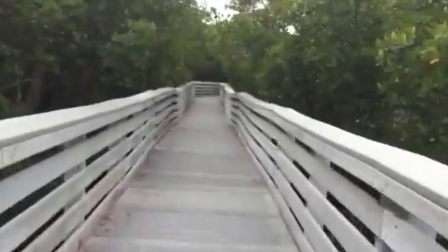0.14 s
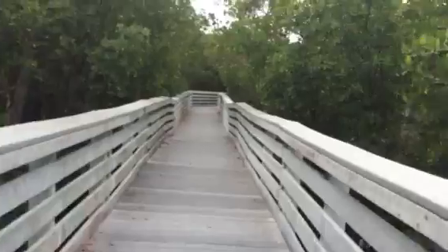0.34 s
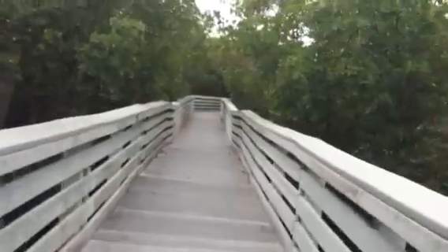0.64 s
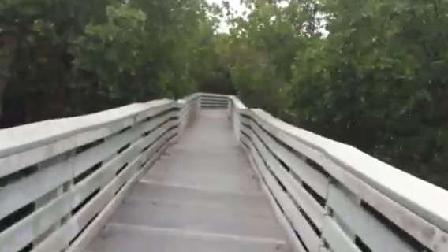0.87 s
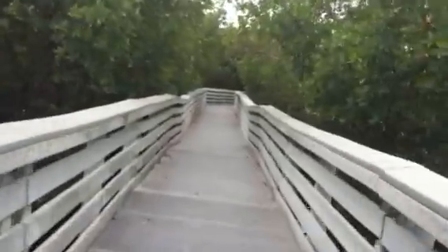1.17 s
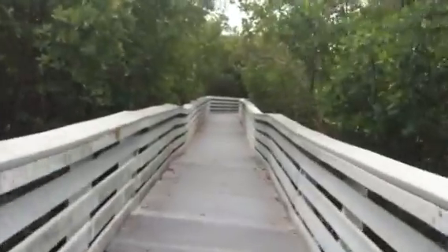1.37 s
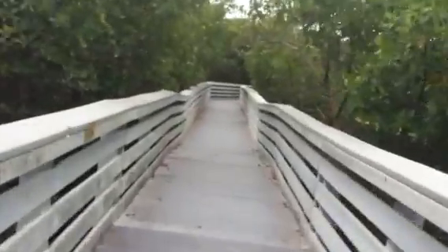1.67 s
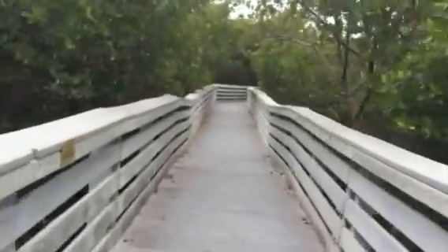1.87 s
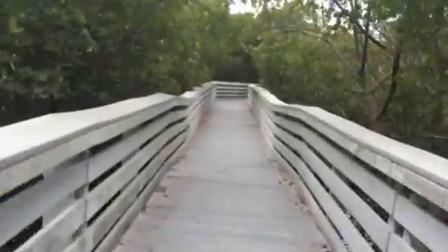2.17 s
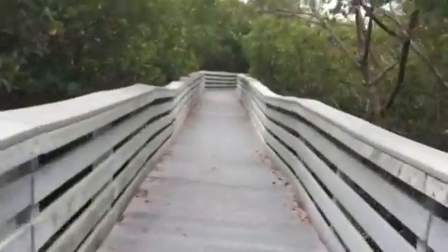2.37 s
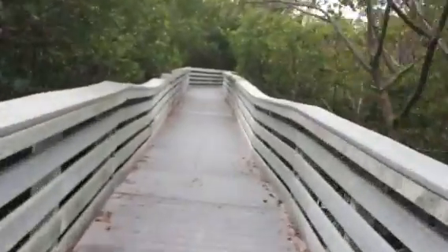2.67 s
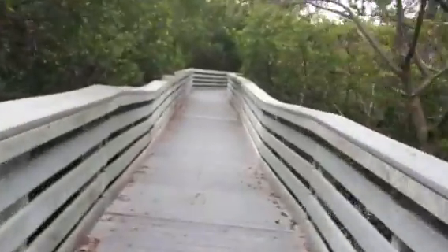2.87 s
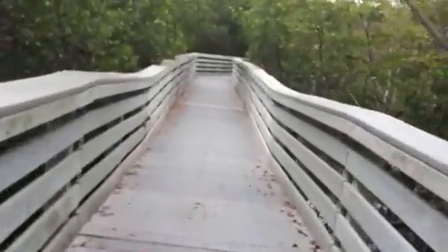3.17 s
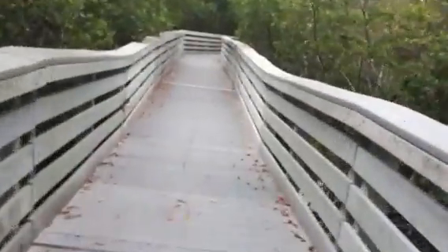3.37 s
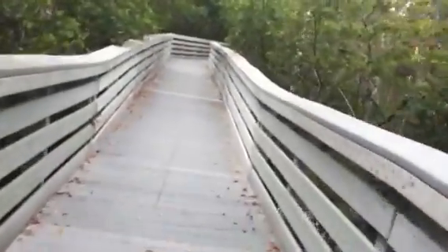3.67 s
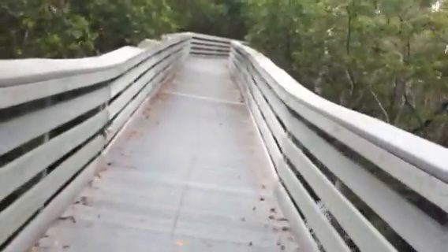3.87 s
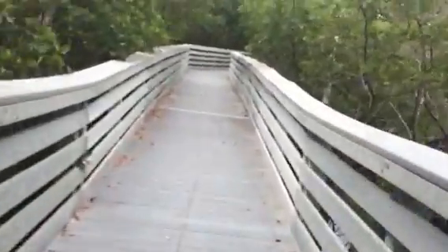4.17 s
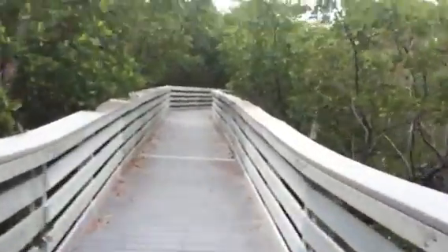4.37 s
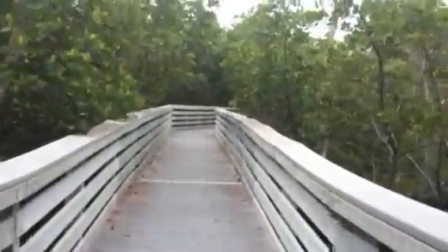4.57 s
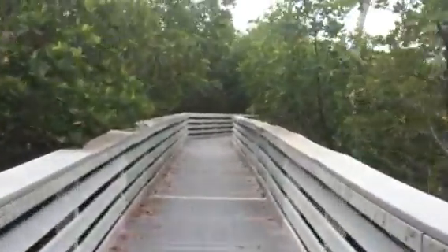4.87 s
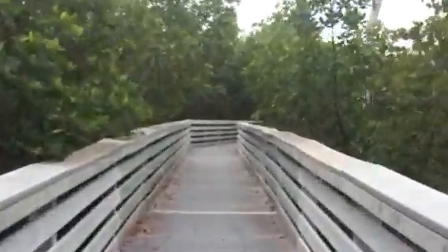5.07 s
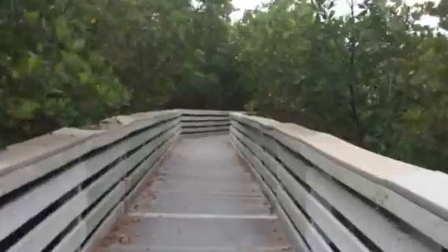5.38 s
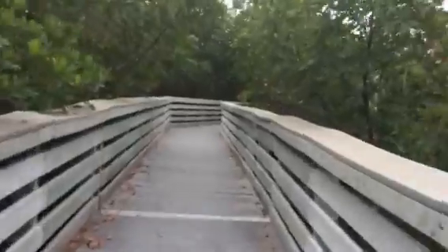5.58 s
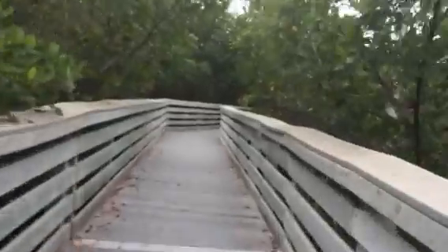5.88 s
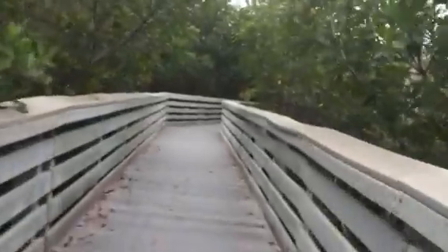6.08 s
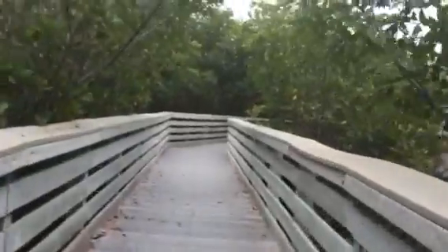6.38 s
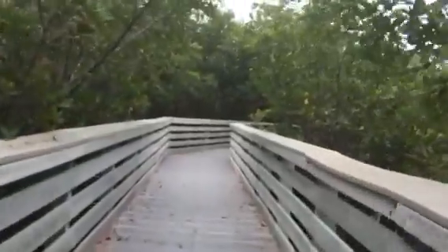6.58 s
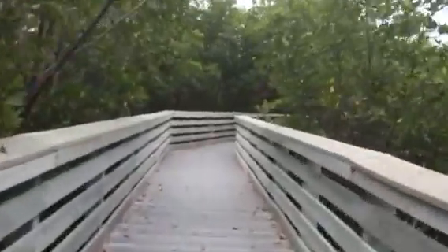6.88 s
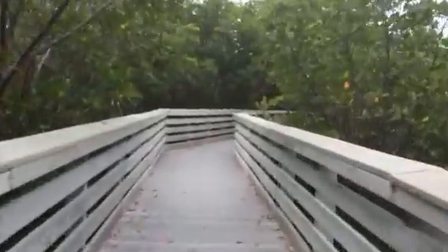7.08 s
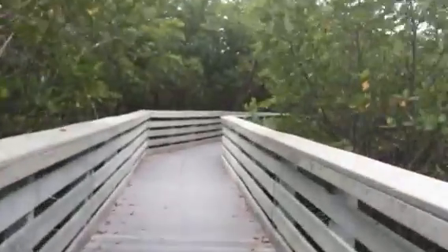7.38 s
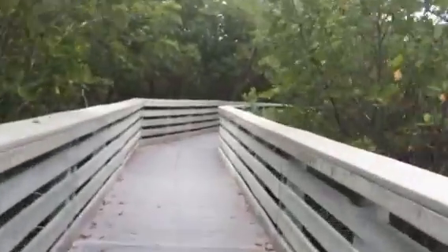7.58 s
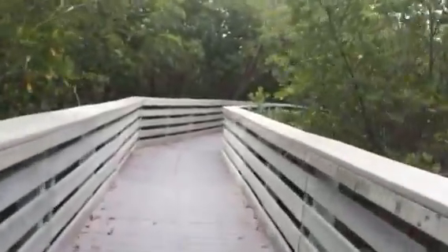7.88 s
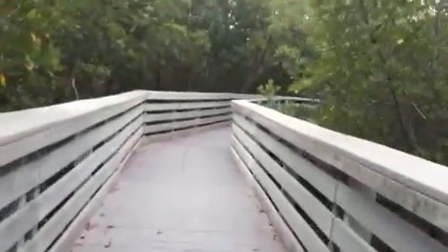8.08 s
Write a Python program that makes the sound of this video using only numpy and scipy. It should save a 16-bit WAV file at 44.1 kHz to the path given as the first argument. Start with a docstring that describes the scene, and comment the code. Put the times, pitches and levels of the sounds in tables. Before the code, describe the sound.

A bicycle coasts along a wooden boardwalk, heard very close from a handheld microphone. From 0 s a low, fluctuating deck drone mixes with soft tyre roll, faint hiss and lumpy air buffeting, with rounded low puffs strongest near 0.7 and 2 s. The freewheel ticks lightly at roughly twenty-four clicks a second. Leaves crack from 0.5 s, clustering around 1.1 to 1.8 s; a loose board knocks dully at 1.5 s and thin steel pings at 1.7 s. At 3.3 s a twig snaps hard in quick steps amid crushed leaves, with a strong board thud at 3.4 s. Metal clinks and bounces at 4.6 s; another board knocks at 5.5 s. From 6.1 to 7.1 s the ticks slow to about eight a second, with more leaf cracks and steel rattles, then speed up to the end at 8.2 s. Faint bark ticks scatter throughout; sharp sounds leave short, faint outdoor tails.

```python
"""A bicycle rolls along a wooden boardwalk; the microphone rides close by, in the rider's hand.
From the start the deck drones under the tyres, air buffets the microphone and the freewheel ticks, some
twenty teeth a second; leaves crack from 0.5 s, loose boards knock from 1.5 s and loose steel pings from 1.7 s.
A twig snaps at 3.3 s amid crushed leaves and a metal part clinks at 4.6 s; the ticks slow from 6.1 to 7.1 s.
Faint bark ticks fall throughout; nearby railings and trees scatter a tail after every sharp sound."""
import sys
import numpy as np
from scipy import signal
from scipy.fft import rfft, irfft, next_fast_len
from scipy.io import wavfile
from scipy.ndimage import map_coordinates

SR = 44100
rng = np.random.default_rng(int(sys.argv[2]) if len(sys.argv) > 2 else 0)


def inscribe(sig):
    """Save sig as 16-bit PCM at rate SR to the path in sys.argv[1].

    A 1-D sig is mono; a 2-D sig holds one channel per row.
    Samples are clipped to [-1, 1] before scaling.
    """
    pcm = np.round(np.clip(np.atleast_2d(sig).T, -1, 1) * 32767)
    wavfile.write(sys.argv[1], SR, pcm.astype(np.int16))


def field_ratio(decibels):
    """Amplitude ratio for a level in dB (20 dB per decade); scalars and array-likes work."""
    return 10 ** (np.asarray(decibels, dtype=float) / 20)


N = 363384  # samples

# course of the ride: (t/s, air buffet level before trim/dB, deck drone level before trim/dB)
RIDE_LEVELS = [(0.0, -51.5, -52.5), (0.88, -50, -45.5), (1.5, -45.5, -49), (1.74, -58, -48),
               (1.91, -45, -44.5), (2.53, -49.5, -52), (3.39, -48, -44.5), (3.81, -43, -53.5),
               (4.07, -50.5, -47), (4.36, -42.0, -55.5), (4.75, -52, -53.5), (5.59, -44.5, -53.5),
               (5.81, -51, -67), (6.11, -44, -48.5), (6.49, -56, -67), (7.0, -52.5, -59),
               (7.26, -47, -48.5), (8.23, -45.5, -50)]
# deck board modes: (f/Hz, width/Hz, relative level/dB)
DECK_MODES = [(138, 46.5, -4), (194.5, 38, -1), (282, 24, -8), (384, 54, -15)]
# spectrum of the tread's roll on wood: (f/Hz, relative level/dB)
ROLL_SPECTRUM = [(150, -21), (250, -2), (418, -8.5), (665, -10.5), (833, -12.5), (1140, -15), (1540, -22.5),
                 (1830, -20.5), (5000, -43.5), (6500, -59), (11000, -120)]
# spectrum of the tyre hiss: (f/Hz, relative level/dB)
HISS_SPECTRUM = [(1760, -2), (3000, 0.5), (3590, -1.5), (5720, -3.5), (10300, -3), (13300, -6.5),
                 (14700, -7.5), (15500, -6)]
# grit and leaf litter on the planks: (t/s, tyre hiss level/dB)
GRIT_HISS = [(0.0, -71.5), (1.17, -68.5), (2.94, -71.5), (3.45, -60.5), (3.77, -69.5), (4.31, -68.5),
             (4.84, -72.5), (5.94, -64.5), (6.84, -70.5), (8.23, -68)]
# mean roll of the tread/dB; share of the grit's swings in it
TREAD_DB, TREAD_FOLLOWS = -59.5, 0.13
# loose boards slapping: (t/s, level before trim/dB, f/Hz)
BOARD_KNOCKS = [(1.506, -35, 162), (3.381, -28, 182), (3.671, -41, 176), (5.485, -32, 232),
                (7.128, -37, 247), (7.874, -44, 197)]
# spectrum of the air buffet: (f/Hz, relative level/dB)
BUFFET_SPECTRUM = [(12, -65.5), (20, -38.5), (35, -12.5), (54, -1), (70, -0.5), (119, -5.5), (220, -11),
                   (290, -36.5), (480, -120)]
# single air puffs on the microphone: (t/s, peak level/dB, width between zero crossings/ms)
AIR_PUFFS = [(0.4915, -27.0, 6.2), (0.66, -22.5, 3.37), (1.5179, -29.5, 5.5), (1.844, -26, 6),
             (1.931, -29.5, 5.7), (1.961, -21.0, 5.9), (3.0522, -30, 5.6), (4.2474, -31.5, 5),
             (4.3496, -32, 5.3), (4.418, -33, 5.1), (5.3049, -29.5, 5.4), (6.2142, -34, 5.2),
             (7.291, -30.5, 5.3), (7.6555, -30.5, 4.8), (8.054, -36, 7.2)]
# the wheel overrunning the pedals: (t/s, ratchet teeth passed so far)
TEETH_PASSED = [(0.0278, 0), (0.6734, 16), (0.9283, 22), (1.0465, 25), (1.3084, 31), (1.4601, 35),
                (1.6761, 40), (1.8352, 44), (2.0188, 48), (2.4813, 59), (3.0425, 72), (3.2375, 76),
                (3.6706, 86), (3.8227, 89), (3.9439, 92), (4.2627, 99), (4.7726, 109), (4.8843, 111),
                (5.0504, 115), (5.2859, 120), (5.3303, 121), (5.6935, 130), (5.7693, 132), (5.9793, 138),
                (6.0786, 140), (6.3061, 142), (6.4487, 143), (6.6538, 145), (6.797, 146), (6.9965, 147),
                (7.0798, 148), (7.1671, 150), (7.2245, 152), (7.3906, 156), (7.4944, 158), (7.6735, 162),
                (7.7353, 163), (7.9823, 168), (8.092, 170), (8.2062, 173)]
# how hard the pawl lands: (t/s, level/dB)
PAWL_LEVELS = [(0, -64), (.55, -58), (.92, -64.5), (1.28, -55), (1.55, -61), (2.1, -55.5), (2.38, -61.5),
               (2.75, -55.5), (3.42, -58.5), (3.95, -60.5), (4.35, -55.5), (4.9, -63.5), (5.2, -57),
               (5.63, -61.5), (6.0, -53), (6.3, -51.5), (6.45, -60), (6.7, -51), (7.0, -58), (7.2, -59.5),
               (7.7, -56.5), (8.05, -60), (8.24, -56)]
# mean spectrum of a pawl tick: (f/Hz, relative level/dB)
PAWL_SPECTRUM = [(700, -33), (1500, -0.5), (3500, -2.5), (5800, -11), (8000, -3.5), (10400, -2.5),
                 (13000, -7.5), (15500, -4)]
# spread from tooth to tooth
TICK_SCATTER_DB, TICK_JITTER_S = 2.5, 0.0012
# leaves cracking under a tyre: (t/s, level before trim/dB, body f/Hz, crisp part relative level before trim/dB)
LEAF_CRACKS = [(0.5442, -47, 1680, -16), (1.0947, -41.5, 1240, -6), (1.202, -44, 1190, -24),
               (1.2288, -40.5, 2540, -26), (1.2548, -38, 1190, -22), (1.5695, -41.5, 2340, -7),
               (1.689, -46, 1310, -14), (1.717, -41.5, 2270, -18), (1.774, -41.5, 2440, -6),
               (2.43, -50.5, 1500, -18), (2.481, -50, 1500, -16), (3.103, -42, 1300, -11.5),
               (3.1712, -44.5, 1230, -8), (3.5197, -40, 1730, -22), (3.8737, -42.5, 1010, -12.5),
               (4.0724, -45, 1140, -10), (4.69, -48, 1020, 2), (4.775, -56, 1000, 6),
               (4.262, -47, 1500, -2), (5.0625, -47.5, 2700, -1), (5.4835, -44.5, 1400, -14),
               (6.0937, -44, 1180, -10), (6.1928, -41.5, 1970, -26.5), (6.2479, -38.5, 1050, -25.5),
               (6.305, -47.5, 1620, -28), (6.347, -46.5, 2400, 0), (6.4222, -47.5, 1170, 1),
               (6.5122, -46, 1990, -21), (6.531, -49, 1010, 3), (6.5914, -44.5, 1140, -2),
               (6.652, -45, 1450, -26.5), (7.1226, -46, 1490, -21), (7.8455, -47, 2040, -12)]
# longer crushes of leaves: (t/s, swell/s, decay by 60 dB/s, level/dB, centre f/Hz)
LEAF_CRUSHES = [(3.265, 0.026, 0.022, -47, 2960), (3.467, 0.033, 0.1, -43, 5300),
                (7.72, 0.022, 0.071, -49, 5400), (8.173, 0.014, 0.091, -59, 4900)]
CRUSH_TREBLE_DB = -18.5
# steps of the breaking twig: (t/s, level before trim/dB)
TWIG_BREAKS = [(3.2826, -3), (3.2841, -21.5), (3.2909, -9.5), (3.2968, -13)]
# what the twig on a plank rings with: (f/Hz, width/Hz, relative level/dB)
TWIG_MODES = [(313, 36, -4), (970, 260, -0.5), (1480, 300, -5), (2750, 270, -13), (3160, 70, 3),
              (3600, 1060, 4), (4450, 1400, -15.5), (7000, 1500, -13.5), (9840, 880, -22),
              (12400, 770, -8.5), (14500, 2300, -14)]
# bounces of a metal part: (t/s, level before trim/dB)
METAL_BOUNCES = [(4.6122, -38), (4.6143, -25), (4.6163, -25), (4.6185, -27.5)]
# what the metal part rings with: (f/Hz, width/Hz, relative level/dB)
METAL_MODES = [(2400, 1200, -10), (3350, 900, -1.5), (3960, 32, 4.5), (3880, 1000, 4), (5140, 22, 15),
               (6700, 1100, -26)]
# rattles of a loose steel part: (t/s, upper mode level before trim/dB, lower mode relative level/dB)
STEEL_PINGS = [(1.686, -59, -6), (4.173, -57, 3), (4.4547, -52, -11), (6.0272, -56, -22), (6.304, -44, -28),
               (6.5124, -54, -15), (6.797, -53, -19.5), (6.999, -59, -23.5)]
# modes of the steel part, upper first: (f/Hz, width/Hz, decay by 60 dB/s)
STEEL_MODES = [(12130, 320, 0.043), (6600, 120, 0.18)]
# scatter from railings and trees around the deck: (f/Hz, decay by 60 dB/s)
RAIL_DECAYS = [(400, 0.15), (4500, 0.23), (10000, 0.33)]


def unit(x):
    """Scale to rms 1."""
    return x / np.sqrt(np.mean(x ** 2) + 1e-20)


def along(points, hz):
    """Read (f/Hz, value) points on a log frequency axis."""
    f, value = np.transpose(points)
    return np.interp(np.log(hz + 1), np.log(f + 1), value)


def curves(rows):
    """One value per sample for each column after the time."""
    s, *columns = np.transpose(rows)
    return [np.interp(np.arange(N) / SR, s, column) for column in columns]


def wobble(rate):
    """A smooth random curve, rate knots a second."""
    knots = rng.standard_normal(int(N * rate / SR) + 4)
    return map_coordinates(knots, [np.arange(N) * rate / SR])


def filtered(x, response):
    """Pass x through a response given as a function of frequency."""
    m = next_fast_len(len(x) + min(len(x) // 4, 8192))  # room for the ringing
    spectrum = rfft(x, m) * response(np.fft.rfftfreq(m, 1 / SR))
    return irfft(spectrum, m)[:len(x)]


def coloured(spectrum):
    """Noise of rms 1 with the given spectrum."""
    return unit(filtered(rng.standard_normal(N), lambda hz: field_ratio(along(spectrum, hz))))


def resonances(modes):
    """Causal response of (f/Hz, width/Hz, level/dB) resonances, alternating in sign."""
    def response(f):
        total = 0
        for k, (centre, width, db) in enumerate(modes):
            damping = 1j * f * width
            total = total + (-1) ** k * field_ratio(db) * damping / (centre * centre - f * f + damping)
        return total
    return response


def add(track, s, sound):
    """Mix a sound into the track at a time."""
    part = track[max(round(s * SR), 0):][:len(sound)]
    part += sound[:len(part)]


def burst(rise, t60):
    """Envelope of peak 1: an exponential rise times a decay of 60 dB in t60 seconds."""
    t = np.arange(SR // 5) / SR
    shape = (1 - np.exp(-t / rise)) * field_ratio(-60 * t / t60)
    return shape / shape.max()


def spiky(power):
    """A fifth of a second of noise with random spikes, sharper for a higher power."""
    return rng.standard_normal(SR // 5) * rng.exponential(size=SR // 5) ** power


def tyres():
    """Tread roughness shakes the boards into their modes; above them rubber rolls and hisses on wood."""
    hiss_db, = curves(GRIT_HISS)
    roll_db = TREAD_DB + TREAD_FOLLOWS * (hiss_db - hiss_db.mean())
    shake = field_ratio(2.8 * wobble(11)) * rng.standard_normal(N)
    ringing = filtered(shake, resonances(DECK_MODES))
    boards = unit(filtered(ringing, resonances([(200, 250, 0)])))
    grain = field_ratio(1.4 * wobble(25) + 1.35 * wobble(120))  # of the planks
    roll = unit(grain * coloured(ROLL_SPECTRUM))
    hiss = unit(field_ratio(1.2 * wobble(11)) * coloured(HISS_SPECTRUM))
    drone_db = curves(RIDE_LEVELS)[1] - 2.5
    return field_ratio(drone_db) * boards + field_ratio(roll_db) * roll + field_ratio(hiss_db) * hiss


def loose_boards():
    """A loose board slaps its joist and gives one low, quickly damped tone."""
    out, t = np.zeros(N), np.arange(SR // 5) / SR
    for s, db, hz in BOARD_KNOCKS:
        add(out, s, field_ratio(db - 3.0) * burst(0.0024, 0.061) * np.sin(2 * np.pi * hz * t))
    return out


def air():
    """Air flowing past the microphone: a lumpy low buffet and single rounded puffs."""
    lumps = field_ratio(0.86 * wobble(14))
    buffet_db = curves(RIDE_LEVELS)[0] + 0.34
    out = field_ratio(buffet_db) * unit(lumps * coloured(BUFFET_SPECTRUM))
    for s, db, ms in AIR_PUFFS:
        u = np.arange(-1500, 1500) / SR / (ms / 2000)  # time in half widths
        puff = (1 - u ** 2) * np.exp(-u ** 2 / 2)
        add(out, s - 1500 / SR, rng.choice([-1, 1]) * field_ratio(db) * puff)
    return out


def freewheel():
    """The pawl drops once per tooth: a short rattle of bright noise, each drop with its own colour."""
    out, (hz, level_db) = np.zeros(N), np.transpose(PAWL_SPECTRUM)
    when, passed = np.transpose(TEETH_PASSED)
    teeth = np.arange(np.ceil(passed[0]), passed[-1] + 0.5)
    for s in np.interp(teeth, passed, when):
        late, louder, longer = rng.standard_normal(size=3)
        colour = np.transpose([hz, level_db + 3 * rng.standard_normal(len(hz))])
        rattle = unit(filtered(spiky(0.7), lambda f: field_ratio(along(colour, f))))
        tick_db = np.interp(s, *np.transpose(PAWL_LEVELS)) + TICK_SCATTER_DB * louder
        envelope = burst(rise=0.0015, t60=0.064 * np.exp(0.46 * longer))
        add(out, s - 0.001 + TICK_JITTER_S * late, field_ratio(tick_db) * envelope * rattle)
    return out


def leaf_cracks():
    """Dry leaves break in spiky noise: a woody body and a crisp, shorter top."""
    out = np.zeros(N)
    brittle = resonances([(4300, 3500, 0)])
    for s, db, hz, crisp_db in LEAF_CRACKS:
        woody = resonances([(hz, 0.57 * hz, 0), (0.5 * hz, 0.44 * hz, -6)])
        body = unit(filtered(spiky(1.4), woody))
        crisp = unit(filtered(spiky(1.4), lambda f: brittle(f) ** 2))
        add(out, s, field_ratio(db - 10.0) * burst(0.0005, 0.084) * body)
        add(out, s, field_ratio(db + crisp_db - 7.5) * burst(0.00052, 0.022) * crisp)
    return out


def leaf_crushes():
    """A crush is a swarm of leaf breaks: clumped spiky noise that swells and trails off."""
    out, t = np.zeros(N), np.arange(SR // 5) / SR
    for s, swell, t60, db, hz in LEAF_CRUSHES:
        shape = np.where(t < swell, t / swell, field_ratio(-60 * (t - swell) / t60))
        core = resonances([(hz, 0.77 * hz, 0)])
        flanks = resonances([(0.64 * hz, 0.35 * hz, -4), (12000, 8000, CRUSH_TREBLE_DB)])
        clumps = field_ratio(3.5 * np.repeat(rng.standard_normal(len(t) // 90), 90))  # 2 ms each
        swarm = clumps * filtered(spiky(1.4), lambda f: core(f) ** 2 + flanks(f))
        add(out, s, field_ratio(db) * shape * unit(swarm))
    return out


def struck(blows, modes, contact):
    """Short blows, each with fine splintering after it, ring a set of modes; a longer contact is duller."""
    force = np.zeros(N)
    for s, db in blows:
        blow = 0.056 * burst(0.0012, 0.028) * rng.standard_normal(SR // 5)
        blow[0] = 1
        add(force, s, field_ratio(db + 15.0) * blow)
    ring = resonances(modes)
    return filtered(force, lambda f: ring(f) / (1 + 1j * f * contact))  # treble falls above 1 / contact Hz


def twig():
    """A twig breaks on a plank in several steps, each a hard, very short blow."""
    return struck(TWIG_BREAKS, TWIG_MODES, contact=0.00004)


def clink():
    """A metal part clinks and bounces, ringing in narrow modes among broad ones."""
    return struck(METAL_BOUNCES, METAL_MODES, contact=0.00021)


def pings():
    """The loose steel part buzzes in two thin modes while it rattles to rest."""
    out = np.zeros(N)
    for s, db, low_db in STEEL_PINGS:
        for (hz, width_hz, t60), level_db in zip(STEEL_MODES, (db, db + low_db)):
            mode = resonances([(hz, width_hz, 0)])
            buzz = unit(filtered(rng.standard_normal(SR // 5), lambda f: mode(f) ** 2))
            add(out, s, field_ratio(level_db - 3.0) * burst(0.001, t60) * buzz)
    return out


def bark():
    """Bits of bark under the tyres: faint woody ticks at random, the higher ones weaker."""
    out = np.zeros(N)
    for when, pitch, size in rng.random((150, 3)):
        hz = 900 * 4 ** pitch
        tick = unit(filtered(rng.standard_normal(SR // 5), resonances([(hz, 0.4 * hz, 0)])))
        level_db = -64 - 6 * pitch - 1.6 * np.log(size)  # a few stand out
        add(out, when * N / SR, field_ratio(level_db) * burst(0.0026, 0.045) * tick)
    return out


def railings(x):
    """Rails and trees scatter a short tail; each frequency dies at its own speed."""
    hz, t, z = signal.stft(rng.standard_normal(SR // 2), SR, nperseg=256)
    fading = z * field_ratio(-60 * t / along(RAIL_DECAYS, hz)[:, None])
    tail = signal.istft(fading, SR, nperseg=256)[1]
    delayed = np.pad(x, (300, 0))  # about 7 ms on the way
    return signal.fftconvolve(delayed, tail / np.linalg.norm(tail))[:N]


def scene():
    """Sharp sounds get the tail of the railings; tyres, boards and air reach the microphone without it."""
    sharp = twig() + clink() + bark() + leaf_cracks() + leaf_crushes() + freewheel() + pings()
    scattered = field_ratio(-16.5) * railings(sharp)
    return (sharp + scattered + tyres() + loose_boards() + air())[None]


def roll_off(x):
    """The treble ends steeply here."""
    return signal.sosfilt(signal.butter(12, 16310, fs=SR, output="sos"), x)


def record(dry):
    """The microphone chain rolls off steeply around 15.35 kHz."""
    dull = filtered(dry[0], lambda hz: 1 / (1 + (hz / 15350) ** 120))
    return roll_off(dull[None])


dry = scene()
out = record(dry)
inscribe(out)
```